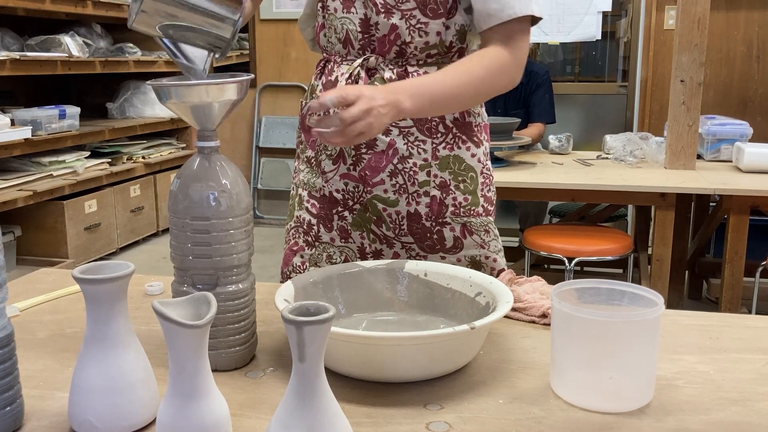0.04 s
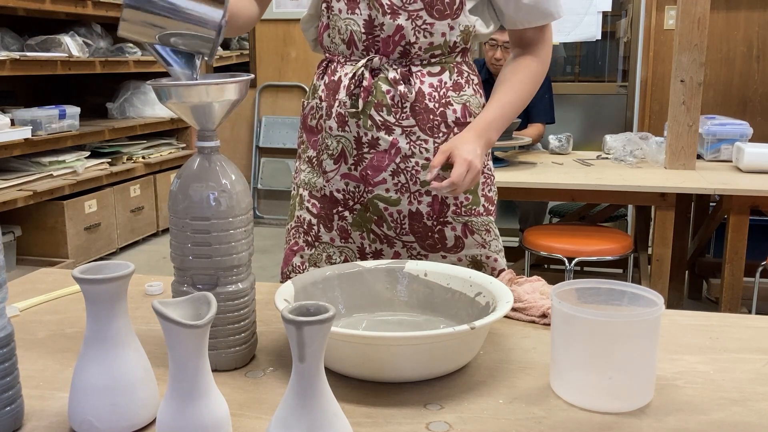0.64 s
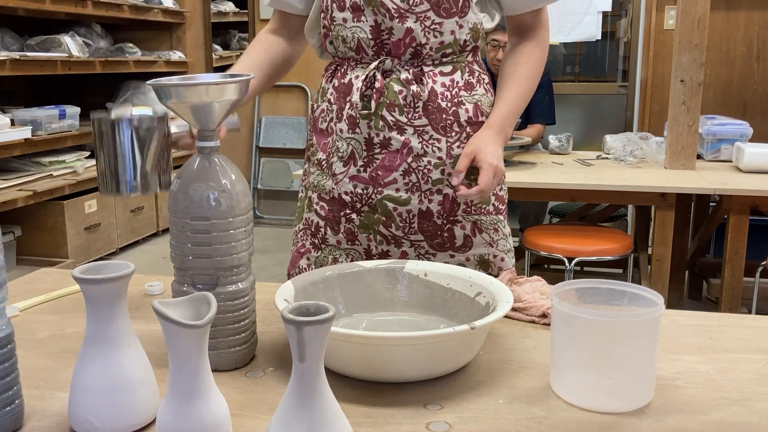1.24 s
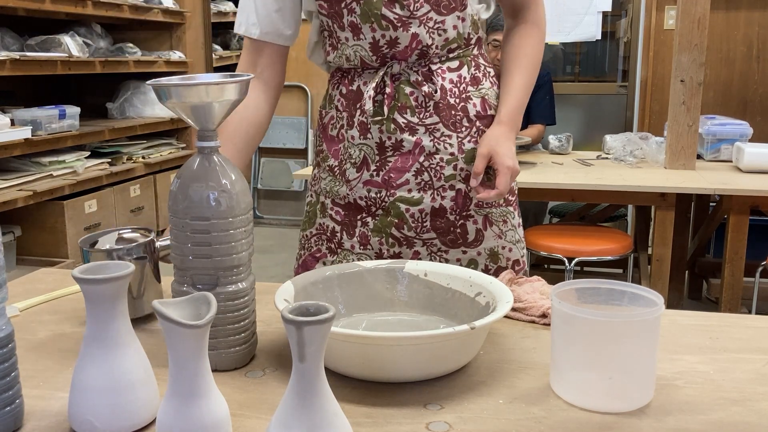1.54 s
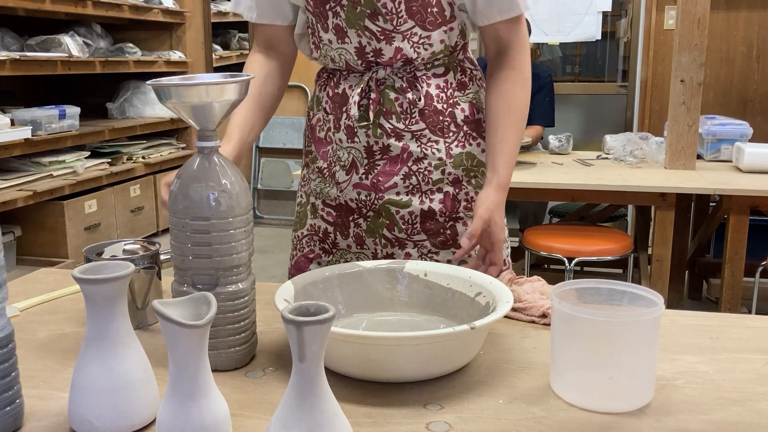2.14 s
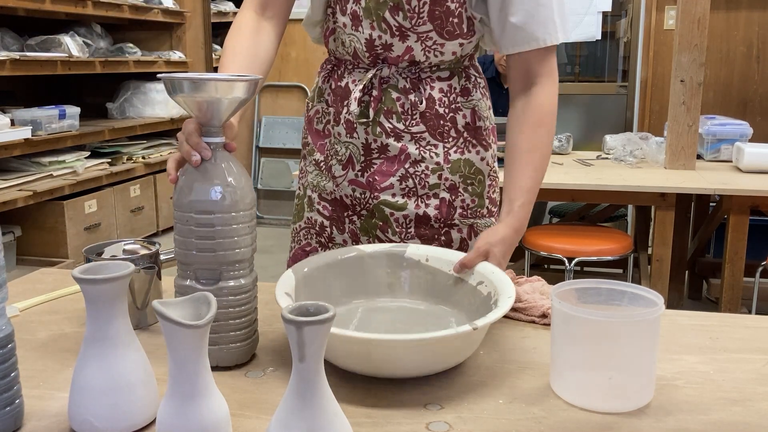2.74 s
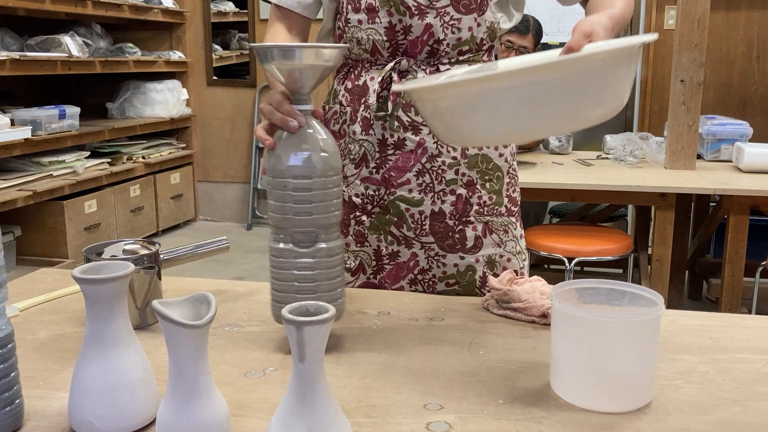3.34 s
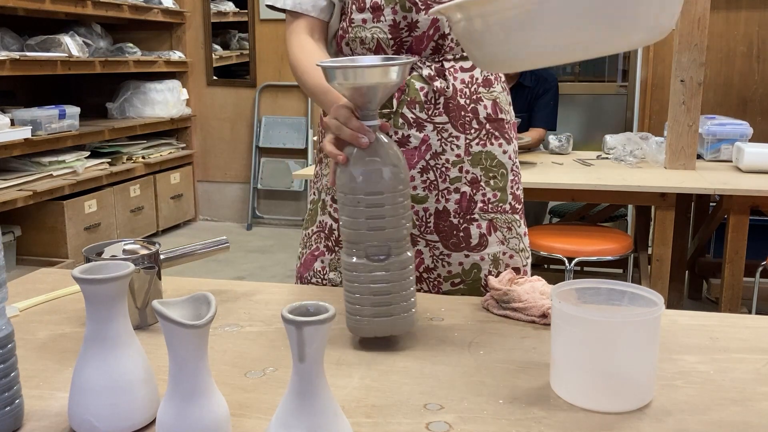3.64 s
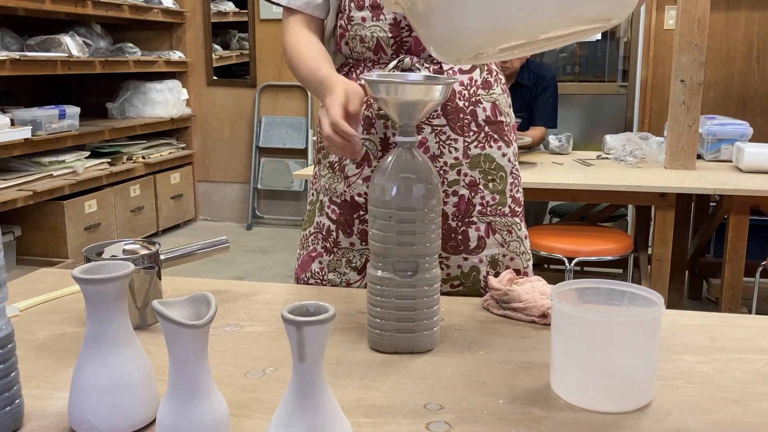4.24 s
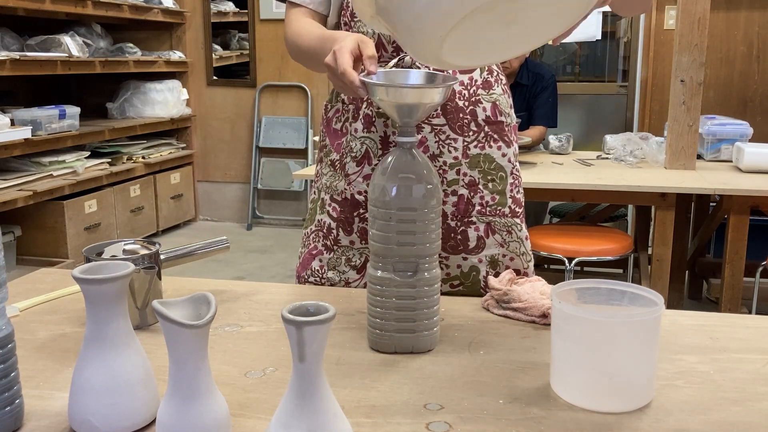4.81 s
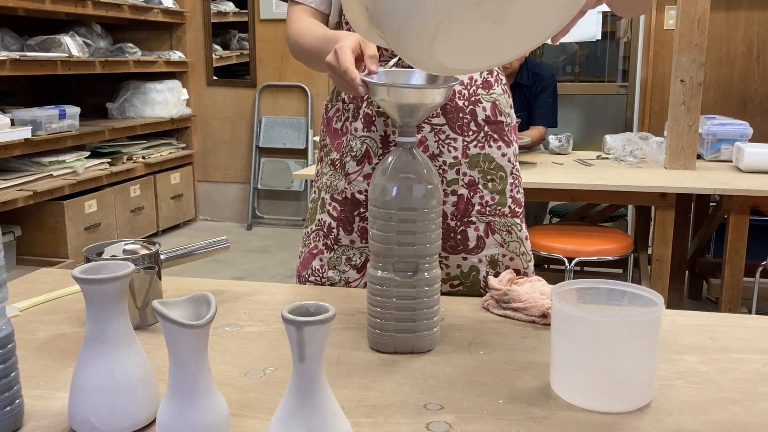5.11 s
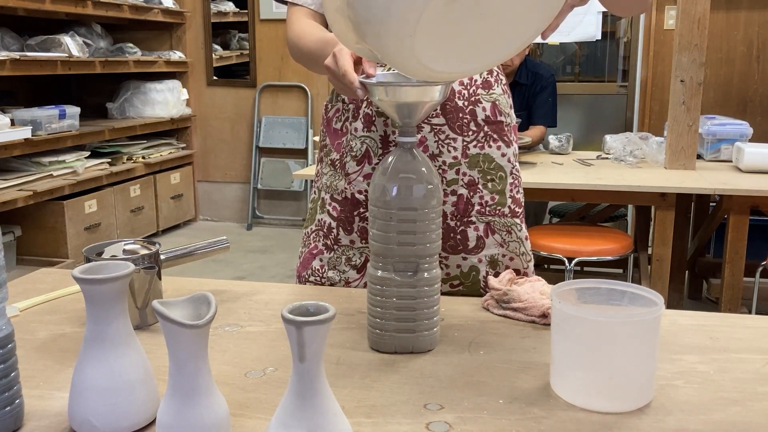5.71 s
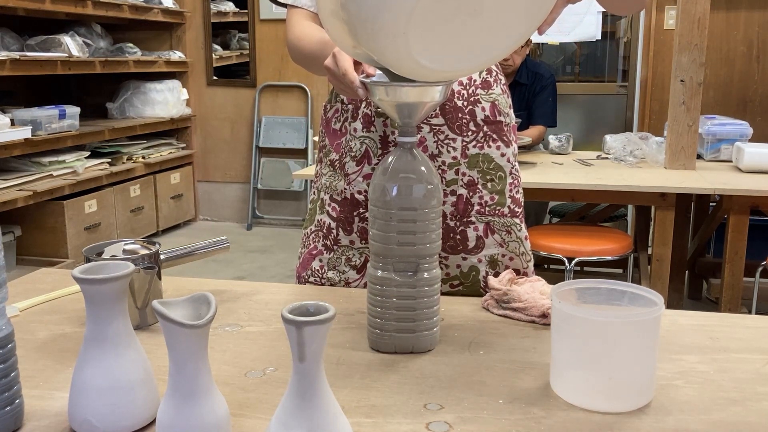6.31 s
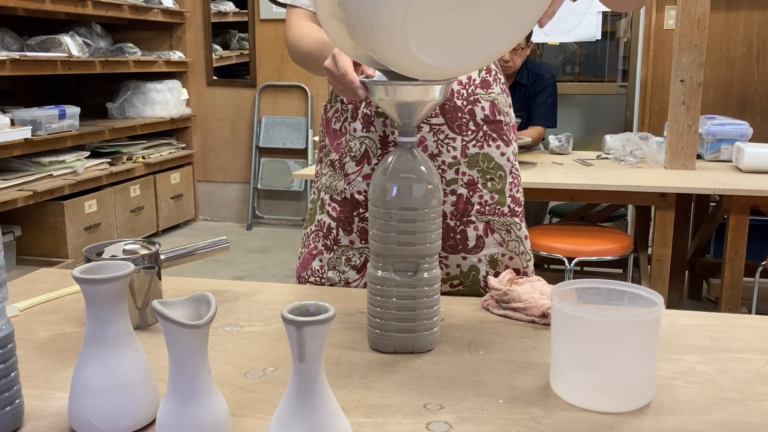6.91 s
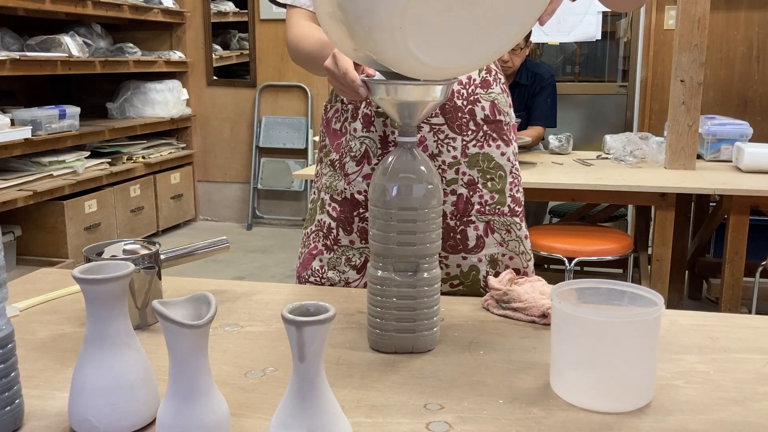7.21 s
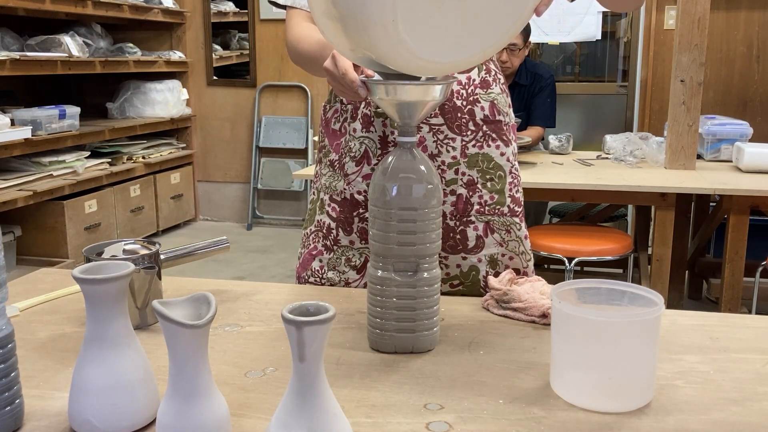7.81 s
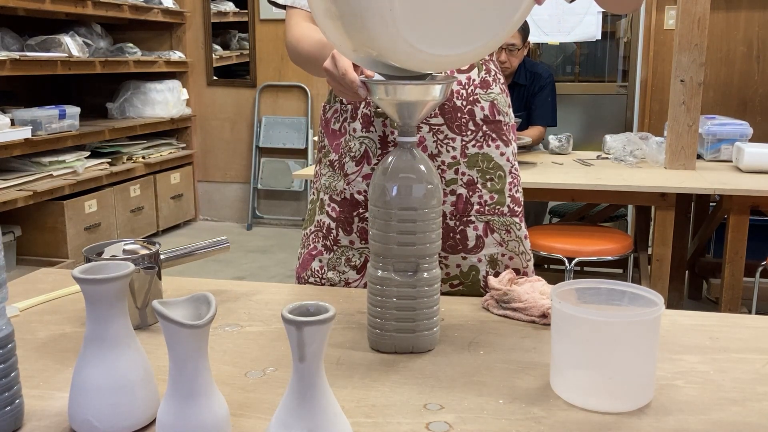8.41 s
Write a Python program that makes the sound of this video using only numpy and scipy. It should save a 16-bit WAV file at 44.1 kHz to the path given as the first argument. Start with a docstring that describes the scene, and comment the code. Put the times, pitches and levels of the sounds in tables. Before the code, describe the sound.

Heard up close in a small, cluttered room, a metal jug is set down on wood with a short rocking knock. About two seconds later comes the loudest sound, a heavy plastic bottle bumping twice on the table. Then thick liquid is poured through a metal funnel, pattering on the cone, bubbling and gulping with low thumps inside the bottle before it thins to drips. A faint hiss and buzz lie underneath.

```python
"""Pouring glaze in a pottery studio

A steel jug, then a full plastic bottle, are set down on a wooden table; the impacts excite damped modes.
Thick glaze is tipped from a basin into a metal funnel on the bottle: it spatters on the resonant cone,
and trapped bubbles oscillate as gurgles, plinks and, where air escapes through the spout, glugs.
Behind lie room air and a thin mains buzz, which a noise suppressor lets up as the sound grows."""
import sys
import numpy as np
from scipy import signal
from scipy.fft import rfft, irfft, next_fast_len
from scipy.io import wavfile
from scipy.ndimage import uniform_filter1d, minimum_filter1d

SR = 44100
rng = np.random.default_rng(int(sys.argv[2]) if len(sys.argv) > 2 else 0)


def wrap_up_sound(samples):
    """Save the sound to the file named by the first command line argument, as 16-bit audio."""
    columns = np.atleast_2d(samples).T
    # keep every value between -1 and 1, then stretch to whole-number steps
    tamed = np.clip(columns, -1, 1)
    steps = np.round(tamed * 32767).astype(np.int16)
    wavfile.write(sys.argv[1], SR, steps)


N = 377055
TIME = np.arange(N) / SR

# air breaking up through the spout: (time [s], gulp level [dB], frequency [Hz], thump level [dB])
GLUGS = [(6.775, -34, 426, -31.5), (7.038, -46, 383, -41.5), (7.064, -38.5, 315, -43),
         (7.303, -41.5, 308, -64), (7.3636, -28, 402, -23), (7.385, -33, 338, -22),
         (7.536, -33.5, 424, -52), (7.559, -34, 333, -25), (8.0776, -25.5, 432, -32.5),
         (8.186, -43.5, 422, -57)]
# bubbles folded into the glaze: (frequency [Hz], relative level of one bubble [dB])
GURGLE = [(170, -11.5), (390, 5), (520, -2), (1020, -1.5), (1700, -5)]
# bubbles in the spatter: (frequency [Hz], relative level of one bubble [dB])
FROTH = [(1450, -10), (1800, 5.5), (2800, -6), (3900, -13)]
# tiny bursting bubbles: (frequency [Hz], relative level of one bubble [dB])
CRACKLE = [(3200, 1), (9000, -6)]
GURGLE_CYCLES, FROTH_CYCLES, CRACKLE_CYCLES = 9, 16, 16   # thick glaze damps bubbles quickly


def stream():
    """Flow noise: running glaze drums on the bottle, entrains bubbles and spatters on the cone."""
    # drumming of the bottle: (frequency [Hz], spectral level [dB])
    drum_spectrum = [(64, 3.0), (82, -1.5), (115, 2.0), (170, -18.5), (900, -76)]
    covered_at_s, covering_s = 7.2, 0.056
    moving = flow()
    # until a pool covers the bare metal, spatter is louder and gurgling weaker
    bare = .5 - .5 * np.tanh((TIME - covered_at_s) / covering_s)
    spatter = from_db(-57 + 7 * bare) * moving ** 0.57   # grows more slowly than the flow
    drumming = noise(drum_spectrum, moving * from_db(-38))
    gurgle = bubble_cloud(moving * from_db(-44 - 6 * bare), 220, GURGLE, GURGLE_CYCLES)
    froth = bubble_cloud(spatter * from_db(-5.5), 210, FROTH, FROTH_CYCLES)
    patter = in_funnel(spatter * from_db(-1) * rms_one(grains(per_s=260, spread_db=5.3)))
    spray = bubble_cloud(spatter * bare * from_db(-18), 210, CRACKLE, CRACKLE_CYCLES)
    return drumming + studio(gurgle + froth + patter + spray, wet_db=-7)


def flow():
    """Incoherent addition: the trickle, the gushes and the churning after each glug sum in power."""
    # glaze leaving the basin: (time [s], duration [s], flow level [dB])
    gushes = [(6.193, 0.28, -11.5), (6.646, 0.25, -0.5)]
    s, gulp_db, _, _ = np.transpose(GLUGS)
    churn = soften(dying(clicks(s, gulp_db + 18.5), t60=0.47), hz=25, order=1)
    trickle = from_db(-23) * gush(s=5.94, length_s=1.883)
    gushing = sum(from_db(db) * gush(start, length_s) for start, length_s, db in gushes)
    return np.sqrt(trickle ** 2 + gushing ** 2 + churn ** 2)


def gush(s, length_s, attack_s=0.0257, release_db_per_s=118):
    """Envelope of one run of glaze: linear rise, hold and exponential decay."""
    rise = np.clip((TIME - s) / attack_s, 0, 1)
    return rise * from_db(-release_db_per_s * np.maximum(TIME - s - length_s, 0))


def glugs():
    """Volume oscillation: big bubbles gulp in the spout, break up and jolt the air in the bottle."""
    gulps, thumps = np.zeros(N), np.zeros(N)
    for s, db, hz, thump_db in GLUGS:
        add(gulps, s, from_db(db + 5.5) * bubble(hz, t60=0.064, rise=0.098, attack_s=0.0034))
        add(thumps, s, from_db(thump_db) * bubble(64.4, t60=0.37, rise=0.03, attack_s=0.0026))
    times, gulp_db, _, _ = np.transpose(GLUGS)
    breakup = soften(dying(clicks(times, gulp_db), t60=0.11), hz=45.3, order=1)
    fragments = bubble_cloud(from_db(-9) * breakup, 400, [(290, 0), (560, 0)], cycles=13)
    return studio(gulps + fragments, wet_db=-6.5) + thumps


def slaps():
    """Liquid impact: a gob of glaze rings the cone and traps a cluster of bubbles."""
    # gobs hitting the funnel: (time [s], smack level [dB], body level [dB])
    gobs = [(6.0313, -43.5, -45.5), (6.2327, -35, -49), (6.34, -35, -70), (6.379, -32.5, -62),
            (6.542, -40, -45.5), (6.707, -38, -30.5), (6.7244, -36.5, -47), (6.859, -41, -31.5),
            (7.074, -38, -56), (7.3017, -44.5, -45), (8.119, -46, -41), (8.3084, -72, -51.5)]
    s, smack_db, body_db = np.transpose(gobs)
    burst = soften(dying(clicks(s, smack_db), t60=0.065), hz=110, order=1)   # a soft gob spreads briefly
    body = soften(dying(clicks(s, body_db), t60=0.12), hz=70, order=1)
    smack = in_funnel(from_db(-10) * burst * rng.standard_normal(N))
    froth = bubble_cloud(from_db(-5) * burst, 900, FROTH, FROTH_CYCLES)
    splat = bubble_cloud(from_db(-4) * body, 700, GURGLE, GURGLE_CYCLES)
    mist = bubble_cloud(from_db(-23) * burst, 600, CRACKLE, CRACKLE_CYCLES)
    return studio(smack + froth + splat + mist, wet_db=-5)


def drips():
    """Random excitation: a drop plinks and breaks into droplets, which ring the cone unevenly."""
    # drops hitting the wall of the cone: (time [s], level [dB])
    drops = [(6.1078, -44.5), (6.661, -47), (6.709, -31.5), (6.9691, -37), (7.112, -45), (7.455, -43),
             (7.561, -49), (7.6187, -28.5), (7.892, -51.5), (7.9748, -45.5), (8.1559, -44)]
    out = np.zeros(N)
    for s, db in drops:
        add(out, s, from_db(db + 2) * bubble(hz=2214, t60=0.067, rise=0.03, attack_s=0.0012))
    splash = soften(dying(clicks(*np.transpose(drops)), t60=0.086), hz=40, order=1)
    droplets = splash * grains(per_s=700, spread_db=4.2)
    cone = soften(ring(droplets, hz=2275, t60=0.049), hz=3020)
    return studio(out + from_db(-14.5) * cone, wet_db=-8)


def plinks():
    """Bubble resonance: single bubbles chirp upward, and the higher ones die sooner."""
    # bursting bubbles and falling drops: (time [s], level [dB], frequency [Hz])
    bubbles = [(0.079, -54, 1790), (0.3375, -45, 1095), (6.033, -47, 990), (6.079, -47, 1780),
               (6.184, -51, 2400), (6.362, -36, 2875), (6.377, -40, 1630), (6.7083, -32.5, 1042),
               (6.716, -34, 630), (6.727, -35.5, 1610), (6.728, -35.5, 2810), (6.808, -38.5, 716),
               (6.864, -32.5, 1166), (6.8827, -36.5, 1100)]
    base_t60_s, cycles = 0.016, 24.5
    out = np.zeros(N)
    for s, db, hz in bubbles:
        add(out, s, from_db(db + 4) * bubble(hz, base_t60_s + cycles / hz, rise=0.088, attack_s=0.00075))
    return studio(out, wet_db=-4)


def spits():
    """Film rupture: tearing glaze throws off a short, bright burst of droplets."""
    # tearing films: (time [s], level [dB], centre frequency [Hz])
    tears = [(6.079, -58.5, 3930), (6.214, -59, 7560), (6.232, -53, 7000), (6.279, -57, 6000),
             (6.361, -52, 6350), (6.805, -42.5, 3340), (6.904, -50.5, 5770), (6.912, -56, 13200),
             (8.026, -52, 4300)]
    t, t60 = TIME[:SR // 5], 0.055
    out = np.zeros(N)
    for s, db, hz in tears:
        band = signal.butter(2, [hz / 1.2, hz * 1.2], "band", fs=SR, output="sos")
        droplets = grains(per_s=4000, spread_db=1.9)[:len(t)]
        add(out, s, from_db(db - 60 * t / t60) * rms_one(signal.sosfilt(band, droplets)))
    return studio(out, wet_db=-2)


def bubble(hz, t60, rise, attack_s):
    """A bubble is a damped oscillator whose pitch climbs as it nears the surface."""
    t = TIME[:int(t60 * SR)]
    pitch = hz * (1 + rise * (t / t60 - .15))
    envelope = from_db(-60 * t / t60) * (1 - np.exp(-t / attack_s))
    return envelope * np.sin(2 * np.pi * np.cumsum(pitch) / SR)


def bubble_cloud(gain, per_s, spectrum, cycles):
    """Superposition of bubbles of random onset, pitch and strength, following the envelope `gain`."""
    out = np.zeros(N)
    low_hz, high_hz = spectrum[0][0], spectrum[-1][0]
    draws = np.random.default_rng(rng.integers(1 << 30)).random((int(per_s * N / SR) - 1, 3))
    for k, (when, pitch, loudness) in enumerate(draws):
        s = (k + when) / per_s
        strength = gain[int(s * SR)] * np.sqrt(SR / per_s)
        if strength > 1e-4:
            hz = low_hz * (high_hz / low_hz) ** pitch
            db = at_hz(spectrum, hz) + 15.3 * (loudness - .5)
            sound = bubble(hz, cycles / hz, rise=0.031, attack_s=1 / hz)
            add(out, s, strength * from_db(db) * sound / np.linalg.norm(sound))
    return out


def in_funnel(x):
    """Convolution with the parallel resonances of the metal cone; a click keeps unit energy."""
    # modes of the cone: (frequency [Hz], bandwidth [Hz], relative level [dB])
    modes = [(1107, 110, -12), (1552, 81, -10), (2213, 80, -2), (2845, 125, -12.5), (3610, 98, -11)]
    t = TIME[:SR // 10]
    response = sum(from_db(db) * width * np.exp(-np.pi * width * t) * np.sin(2 * np.pi * hz * t)
                   for hz, width, db in modes)
    response = soften(response, hz=3620, order=4)
    return signal.fftconvolve(x, response / np.linalg.norm(response))[:N]


def bottle():
    """Two-stage impact: hard plastic feet clack hollowly, then the mass of the glaze thuds."""
    # feet meeting the table: (time [s], clack level [dB], thud level [dB])
    hits = [(2.483, -32, -32), (3.834, 2.5, -16), (3.8416, 5, -3.5), (3.9057, 4.5, -29), (3.913, -4.5, -2),
            (3.942, -36, -20), (4.078, -32, -18), (4.217, -24, -26.5)]
    # modes of the full bottle: (frequency [Hz], level [dB], decay time T60 [s])
    thud_modes = [(37.4, -21.5, 0.6), (61, -17.5, 0.52), (125.4, -25.5, 0.18), (265.6, -40, 0.47),
                  (398, -27, 0.15)]
    # modes rung by its feet: (frequency [Hz], level [dB])
    clack_modes = [(745, -37.5), (800, -29), (950, -33), (1030, -33.5)]
    # clatter of the bottle: (frequency [Hz], spectral level [dB])
    clatter_spectrum = [(150, 6.5), (550, -8.5), (900, -13.5), (1400, -20.5), (1800, -18), (3000, -40.5),
                        (15000, -57)]
    glaze_lag_s = 0.00436
    s, clack_db, thud_db = np.transpose(hits)
    feet, weight = clicks(s, clack_db), clicks(s + glaze_lag_s, thud_db)
    clatter = noise(clatter_spectrum, from_db(-30.5) * soften(dying(feet, t60=0.29), hz=90, order=1))
    clack = sum(from_db(db) * ring(feet * rng.choice([-1, 1], N), hz, t60=0.034)
                for hz, db in clack_modes)
    thud = sum(from_db(db) * ring(weight, hz, t60) for hz, db, t60 in thud_modes)
    return studio(soften(clack, hz=1600, order=4), wet_db=-4.5) + clatter - soften(thud, hz=510)


def jug():
    """Impact: the jug lands and rocks; the knock rings briefly, then fades ever faster, as if gated."""
    # jug meeting the table: (time [s], clatter level [dB], ring level [dB])
    hits = [(1.7024, -28.5, 4.5), (1.728, -28, -13.5), (1.7844, -28.5, -7)]
    # modes of the table top: (frequency [Hz], level [dB])
    table_modes = [(124, -30), (196, -29), (232, -22), (276, -23), (307, -22), (392, -28), (432, -24.5),
                   (471, -23.5), (517, -29.5), (592, -29), (630, -28), (663, -29.5)]
    # mode of the steel wall: (frequency [Hz], level [dB])
    wall_modes = [(2890, -54)]
    # clatter of the jug: (frequency [Hz], spectral level [dB])
    clatter_spectrum = [(80, -37.5), (220, 1), (600, -1), (800, -11.5), (1100, -13), (1500, -23.5),
                        (3500, -37.5), (4500, -59.5)]
    # hard tick of the steel rim: (frequency [Hz], spectral level [dB])
    tick_spectrum = [(70, -32), (270, 1), (1100, -6.5), (1600, -33.5), (3700, -34.5), (4300, -65.5)]
    rim_touch_s, fade_from_s, fade_s = 1.808, 1.81, 0.17
    s, clatter_db, ring_db = np.transpose(hits)
    clatter = noise(clatter_spectrum, dying(clicks(s, clatter_db), t60=0.52))
    tick = noise(tick_spectrum, dying(clicks(s[:1], -16), t60=0.018))
    board = soften(struck(clicks(s, ring_db), table_modes, t60=0.31), hz=869, order=3)
    board = disperse(board, hz=290, width_hz=210)
    board = board - soften(board, hz=114, order=1)   # a small board radiates little bass
    wall = struck(clicks(np.array([rim_touch_s]), 0), wall_modes, t60=0.53)
    fade_db = np.minimum(60 * (np.maximum(TIME - fade_from_s, 0) / fade_s) ** 2, 200)
    return (from_db(2) * board + tick + clatter + wall) * from_db(-fade_db)


def rattles():
    """Loose contact: the funnel ticks against the neck of the bottle and rings faintly."""
    # ticks as the bottle settles and the fingers let go: (time [s], level [dB])
    ticks = [(3.9456, -65), (4.084, -67), (4.221, -63.5), (4.539, -73)]
    # modes of the spout: (frequency [Hz], level [dB])
    spout_modes = [(3390, 0.5), (9500, -7), (12100, -4.5)]
    return studio(struck(clicks(*np.transpose(ticks)), spout_modes, t60=0.034), wet_db=10)


def air_movement():
    """Infrasound: moving arms push slow pressure pulses at the microphone, over a faint draught."""
    # puffs of air: (time [s], peak level [dB])
    puffs = [(0.055, -48.5), (0.26, -46), (0.401, -38), (0.638, -28.5), (0.816, -40.5), (1.54, -52),
             (2.47, -50.5), (3.23, -54), (4.08, -31.5), (4.262, -38.5), (4.553, -44), (4.8, -52.5),
             (5.11, -56), (5.49, -51.5)]
    width_s = 0.0403
    pulses = sum(from_db(db) * np.exp(-np.minimum(((TIME - s) / width_s) ** 2, 20)) for s, db in puffs)
    draught = from_db(-67) * rms_one(soften(rng.standard_normal(N), hz=2.6))
    return pulses + draught


def mains_buzz(mains_hz=50):
    """Harmonic series of the mains: even orders dominate, odd ones emerge near one resonance."""
    # envelope of the harmonics: (frequency [Hz], relative level [dB])
    envelope = [(1200, -15), (2300, -5.5), (2700, -15), (3500, -9), (4100, -0.5), (5800, -5.5),
                (7000, -12.5), (10000, -30.5)]
    # harmonics that stand out as a thin whine: (frequency [Hz], boost [dB])
    whine = [(4800, 6.5), (5750, 7.5)]
    order = np.arange(SR // (2 * mains_hz) + 1)
    hz = mains_hz * order
    odd_db = -15 + 17 * np.exp(-((hz - 5650) / 330) ** 2)
    whine_db = sum(db * (np.abs(hz - line_hz) < mains_hz / 2) for line_hz, db in whine)
    level = from_db(at_hz(envelope, hz) + order % 2 * odd_db + whine_db + rng.standard_normal(len(hz)))
    period = irfft(level * np.exp(2j * np.pi * rng.random(len(hz))))
    return rms_one(np.resize(period, N))


def background(swell_db):
    """Noise floor: buzz, room air and hiss rise with `swell_db`, the hiss most steeply."""
    # room air: (frequency [Hz], spectral level [dB])
    air_spectrum = [(30, -1), (90, -7), (200, -1.5), (800, -14), (2200, -23), (2700, -27), (5700, -27),
                    (9000, -37), (15500, -45)]
    buzz = from_db(-73.5 + swell_db) * mains_buzz()
    air = noise(air_spectrum, from_db(-67 + 0.99 * swell_db))
    hiss = noise([(3000, -15.0), (7000, 5.5)], from_db(-90.5 + 1.6 * swell_db))
    return buzz + air + hiss


def suppressor_db(sound, window_s=0.035):
    """Expansion and limiting: the background's gain rises with the sound but ducks at hard blows."""
    # suppressor and limiter curve: (sound level [dB], background gain [dB])
    curve = [(-70, 1), (-21.5, 15.5), (-14.5, 3.5)]
    size = int(window_s * SR)
    level_db = 10 * np.log10(np.maximum(uniform_filter1d(sound ** 2, size), 1e-12))
    gain_db = np.interp(level_db, *np.transpose(curve))
    return uniform_filter1d(minimum_filter1d(gain_db, size), size)


def studio(x, wet_db, t60=0.22):
    """Reverberation: direct sound plus the diffuse tail of a cluttered room."""
    t = TIME[:SR // 2]
    tail = rng.standard_normal(len(t)) * from_db(-60 * t / t60) * (t > .004)
    return x + from_db(wet_db) * signal.fftconvolve(x, tail / np.linalg.norm(tail))[:N]


def ring(x, hz, t60):
    """Damped resonator: a unit click starts a decaying sine of height 1."""
    r, w = from_db(-60 / (t60 * SR)), 2 * np.pi * hz / SR
    return signal.lfilter([0, np.sin(w)], [1, -2 * r * np.cos(w), r * r], x + 1e-18)


def struck(x, modes, t60):
    """Modal superposition: all modes of a body ring from the same blows."""
    return sum(from_db(db) * ring(x, hz, t60) for hz, db in modes)


def disperse(x, hz, width_hz):
    """Dispersion: bending waves near one frequency arrive late, which smears a blow."""
    r = np.exp(-np.pi * width_hz / SR)
    poles = [1, -2 * r * np.cos(2 * np.pi * hz / SR), r * r]
    return signal.lfilter(poles[::-1], poles, x + 1e-18)


def soften(x, hz, order=2):
    """Low-pass filter, as when a soft contact takes the top off a blow."""
    return signal.sosfilt(signal.butter(order, hz, fs=SR, output="sos"), x)


def dying(x, t60):
    """Exponential decay: an envelope that jumps at each click."""
    return signal.lfilter([1], [1, -from_db(-60 / (t60 * SR))], x + 1e-18)


def clicks(times, db):
    """One impulse at each time."""
    out = np.zeros(N)
    out[np.round(times * SR).astype(int)] = from_db(db)
    return out


def grains(per_s, spread_db):
    """Poisson process: random clicks of uneven size and sign."""
    sizes = from_db(spread_db * np.minimum(rng.exponential(1, N), 3)) * rng.choice([-1, 1], N)
    return sizes * (rng.random(N) < per_s / SR)


def noise(spectrum, gain):
    """Gaussian noise of rms `gain`, coloured after the envelope so that attacks keep the colour."""
    power = np.mean(from_db(at_hz(spectrum, np.fft.rfftfreq(SR, 1 / SR))) ** 2)
    return colour(gain * rng.standard_normal(N), spectrum) / np.sqrt(power)


def colour(x, spectrum):
    """Minimum-phase filter with the given spectrum: nothing sounds early."""
    size = next_fast_len(len(x) + 8192, True) // 2 * 2
    magnitude = from_db(at_hz(spectrum, np.fft.rfftfreq(size, 1 / SR)))
    cepstrum = irfft(np.log(magnitude))
    cepstrum[1:size // 2] *= 2
    cepstrum[size // 2 + 1:] = 0
    return irfft(rfft(x, size) * np.exp(rfft(cepstrum)))[:len(x)]


def at_hz(points, hz):
    """Interpolate a spectrum on a log-frequency axis."""
    f, db = np.transpose(points)
    return np.interp(np.log(np.maximum(hz, 1)), np.log(f), db)


def add(out, s, sound):
    """Superpose a sound at time s."""
    at = int(round(s * SR))
    out[at:at + len(sound)] += sound[:N - at]


def from_db(db):
    """Decibels to amplitude ratio."""
    return 10 ** (np.asarray(db) / 20)


def rms_one(x):
    """Normalise to unit rms."""
    return x / np.sqrt(np.mean(x ** 2) + 1e-20)


def scene():
    """Superposition at one close point; the level of the sum steers the background."""
    sound = jug() + bottle() + rattles()
    sound = sound + stream() + slaps() + drips() + spits() + plinks() + glugs() + air_movement()
    return (sound + background(suppressor_db(sound)))[None]


def record(dry):
    """Band limiting: a steep elliptic low-pass cuts the top."""
    cutoff_hz = 15500
    return signal.sosfilt(signal.ellip(10, .1, 80, cutoff_hz, fs=SR, output="sos"), dry)


dry = scene()
out = record(dry)
wrap_up_sound(out)
```